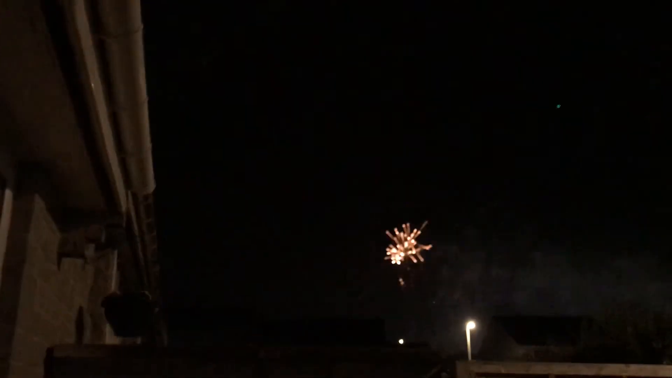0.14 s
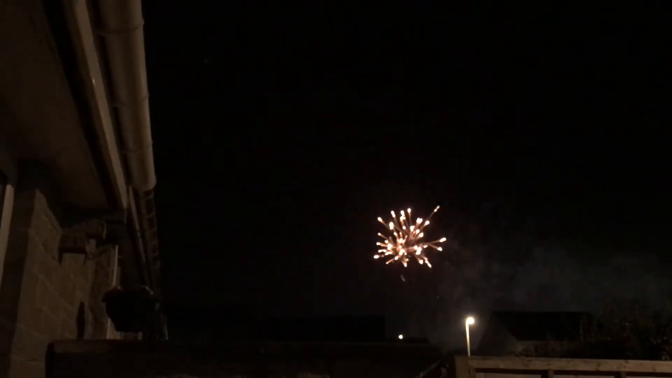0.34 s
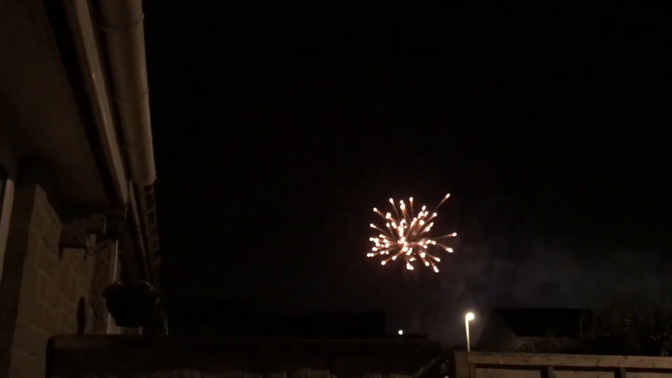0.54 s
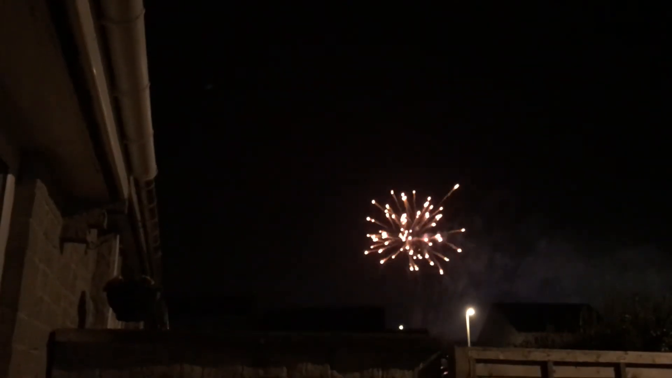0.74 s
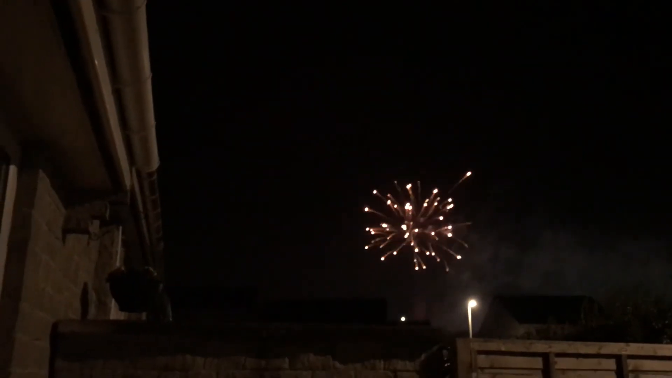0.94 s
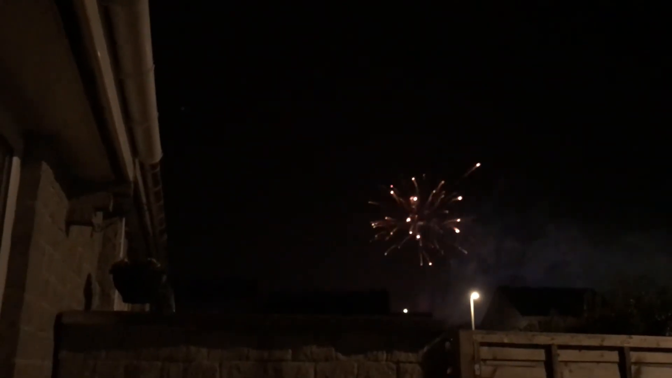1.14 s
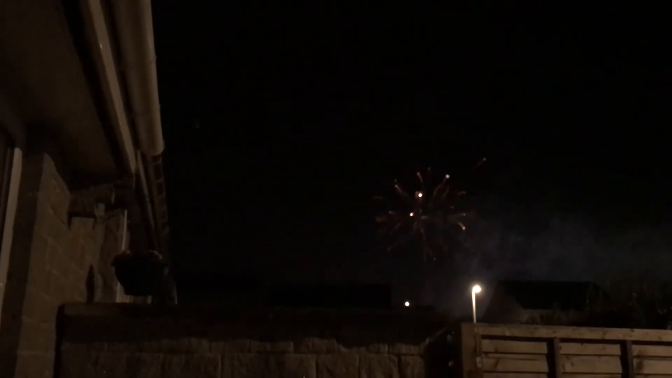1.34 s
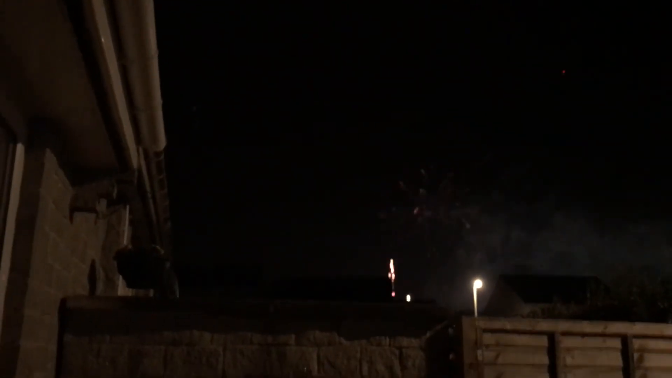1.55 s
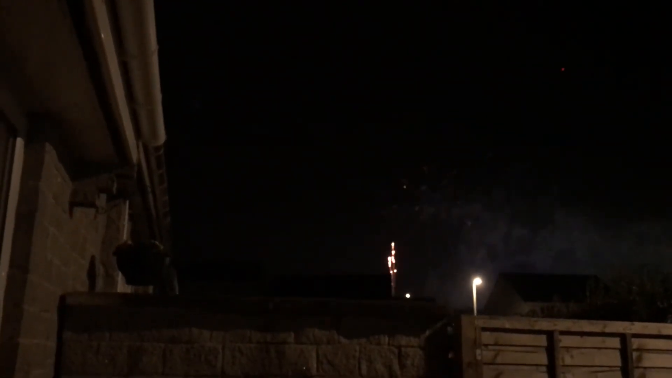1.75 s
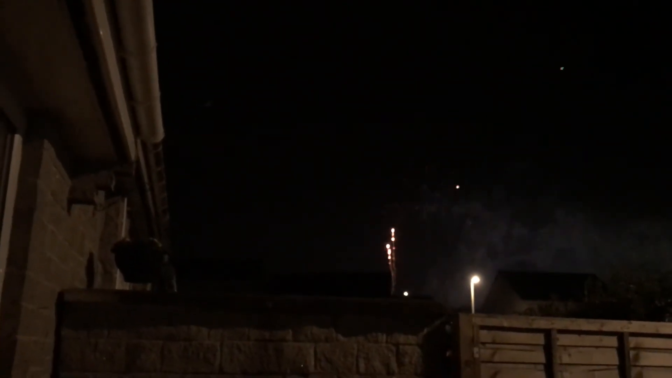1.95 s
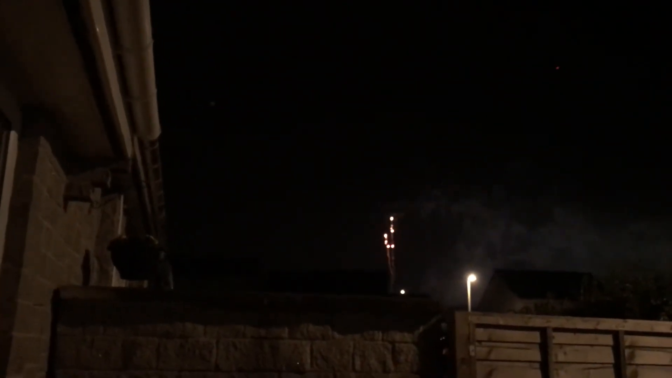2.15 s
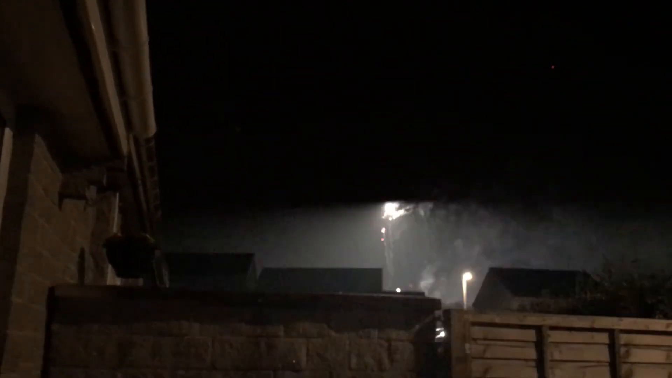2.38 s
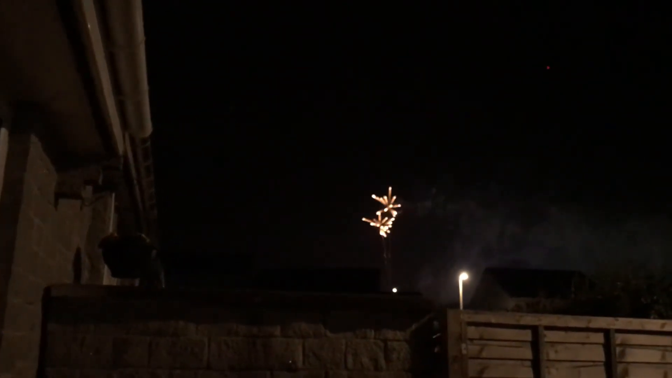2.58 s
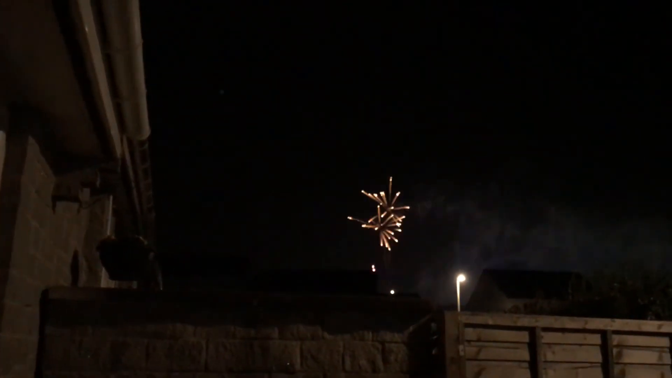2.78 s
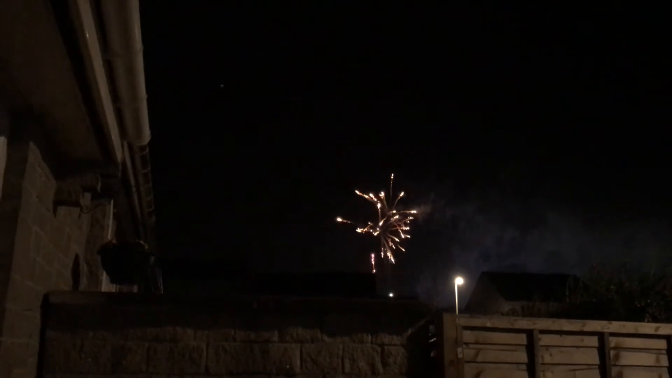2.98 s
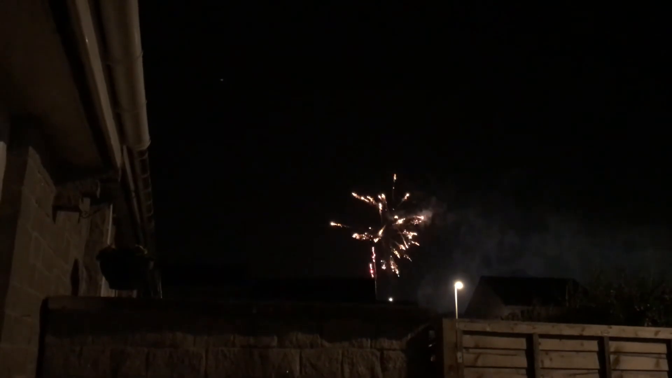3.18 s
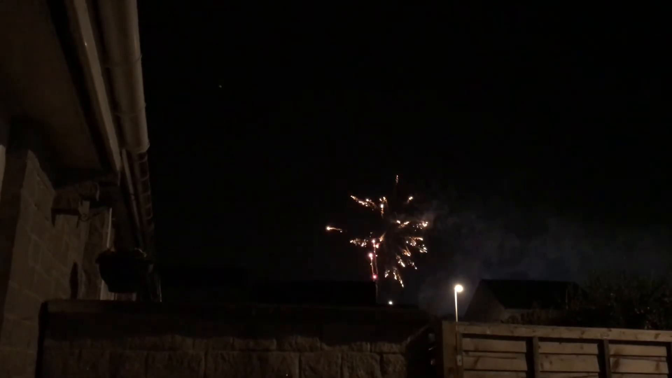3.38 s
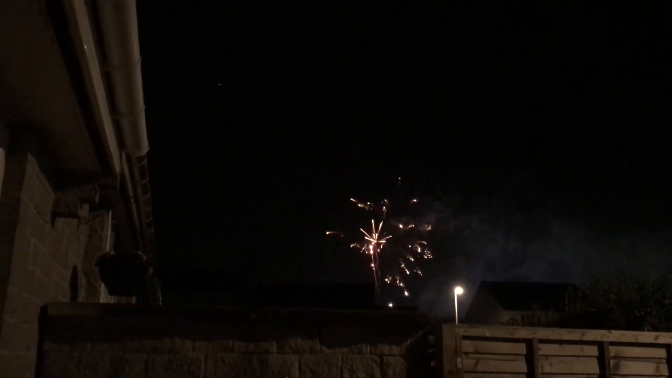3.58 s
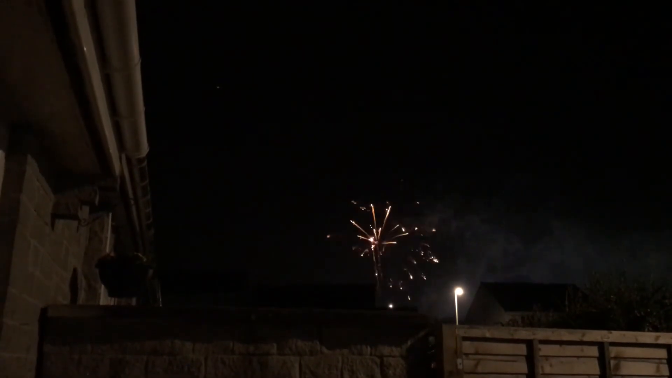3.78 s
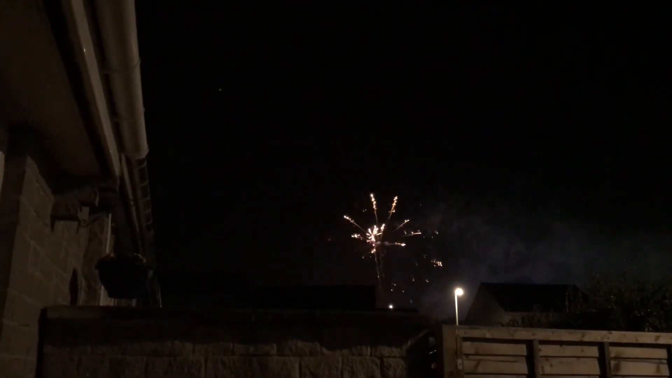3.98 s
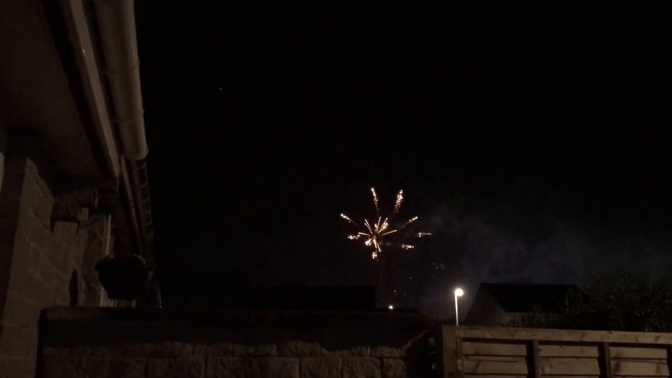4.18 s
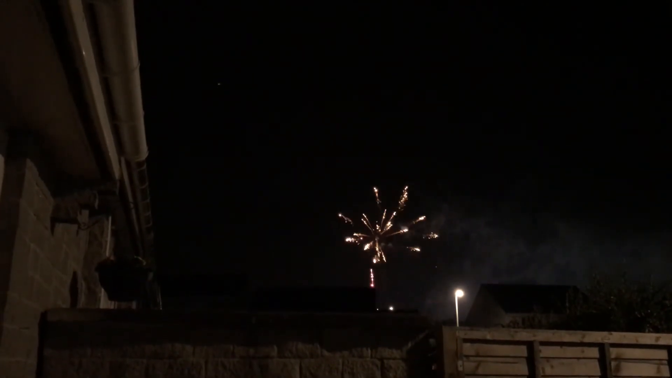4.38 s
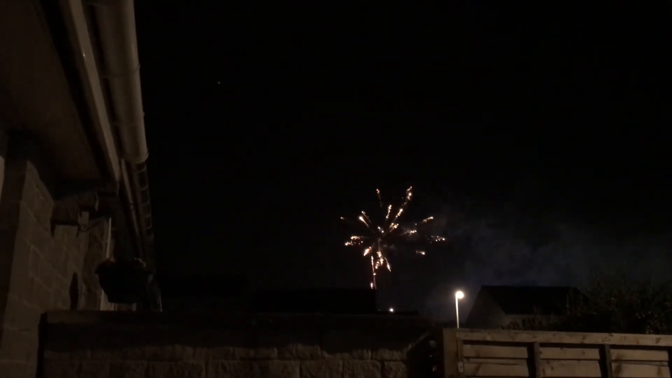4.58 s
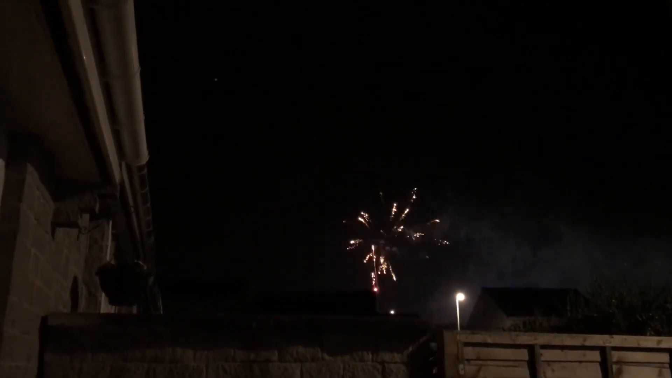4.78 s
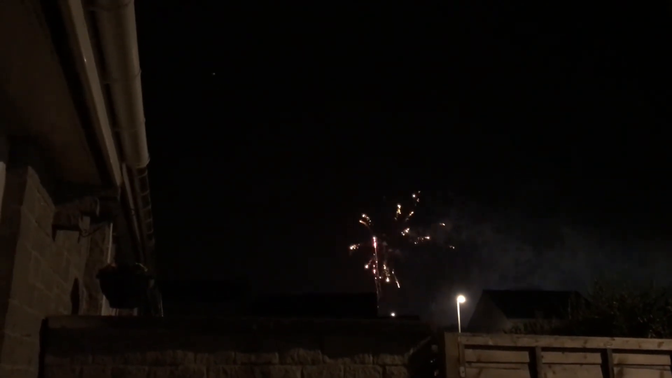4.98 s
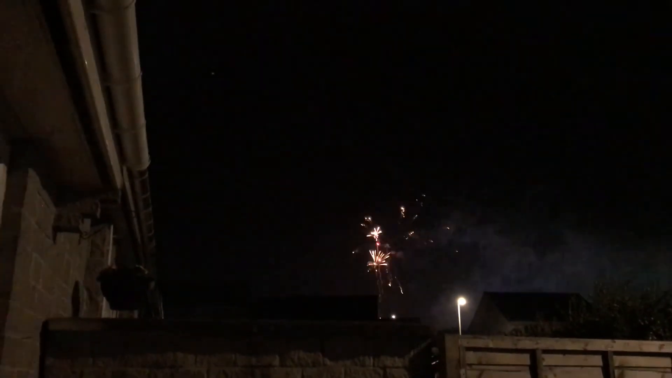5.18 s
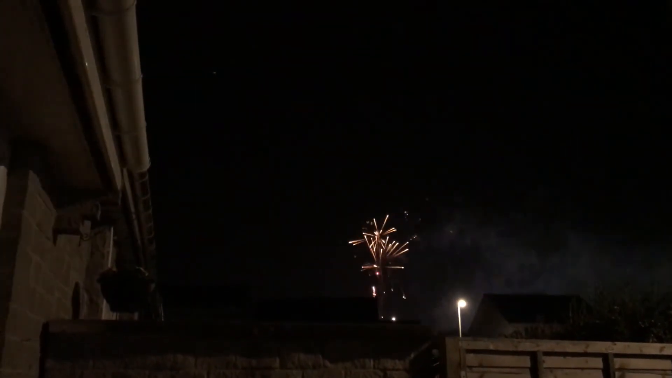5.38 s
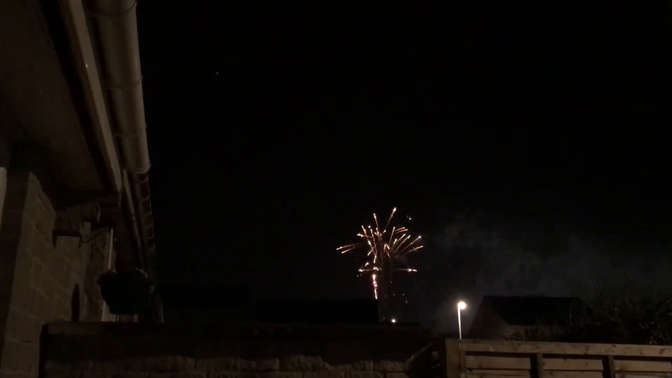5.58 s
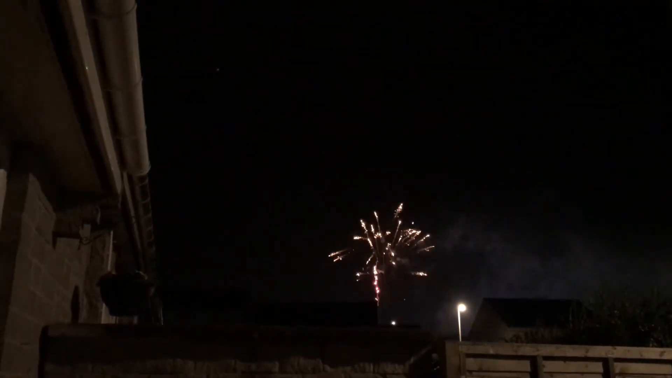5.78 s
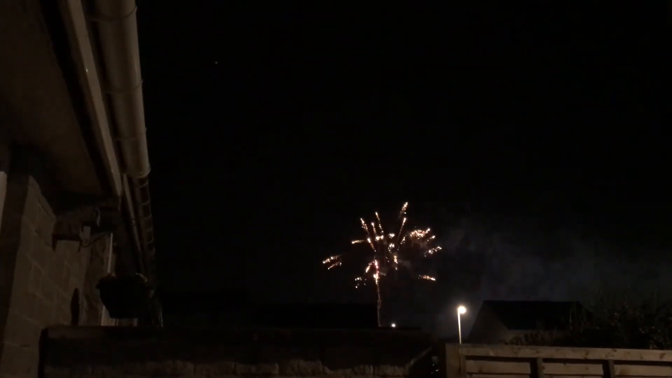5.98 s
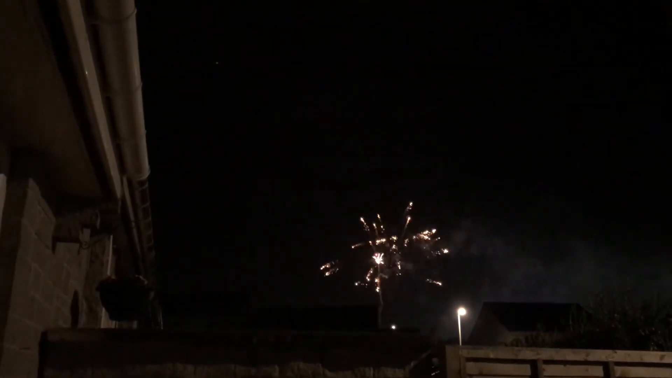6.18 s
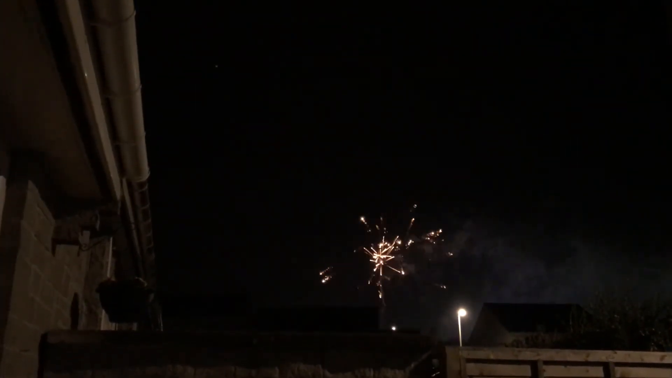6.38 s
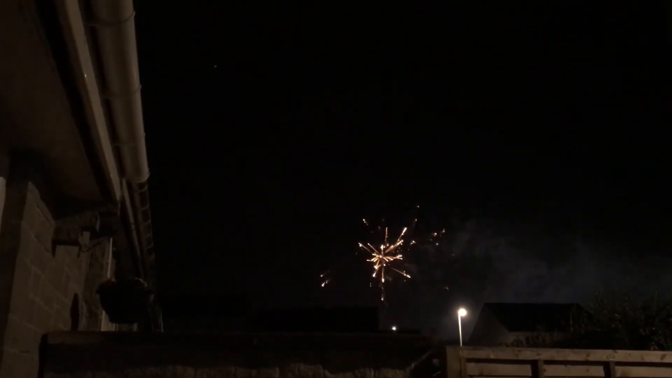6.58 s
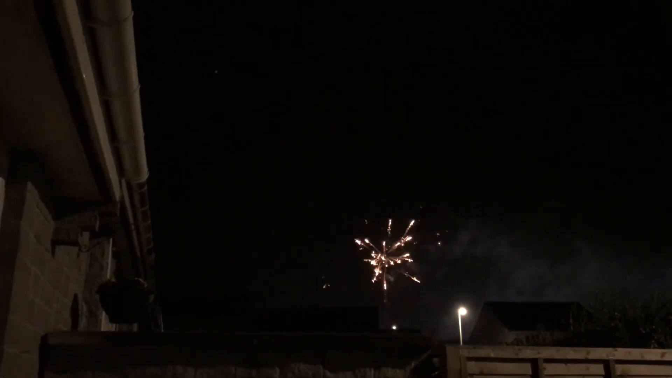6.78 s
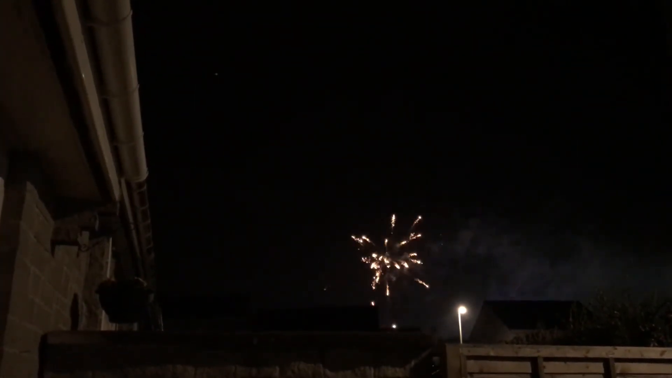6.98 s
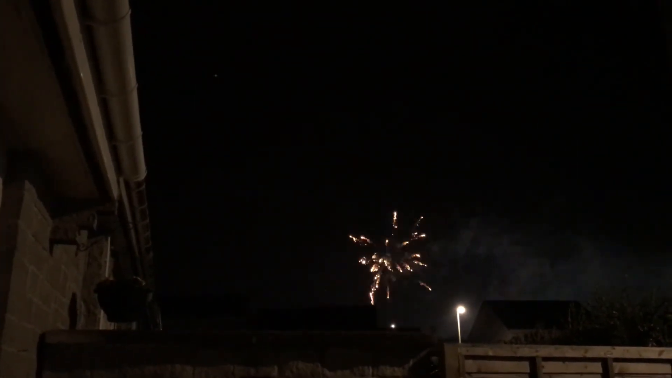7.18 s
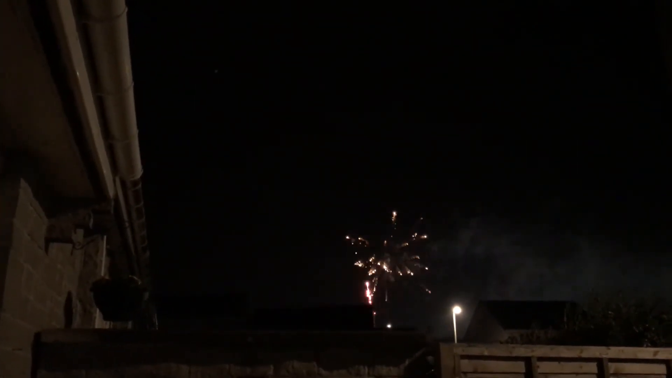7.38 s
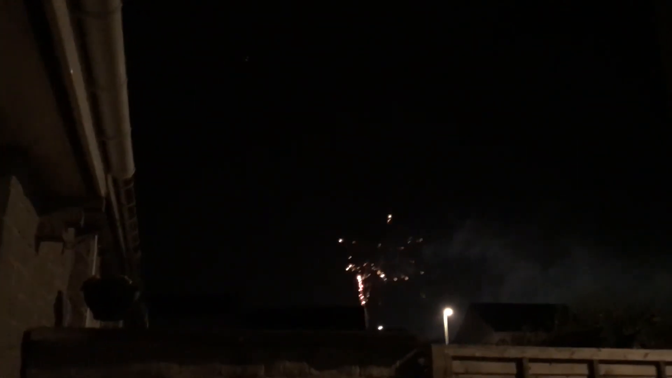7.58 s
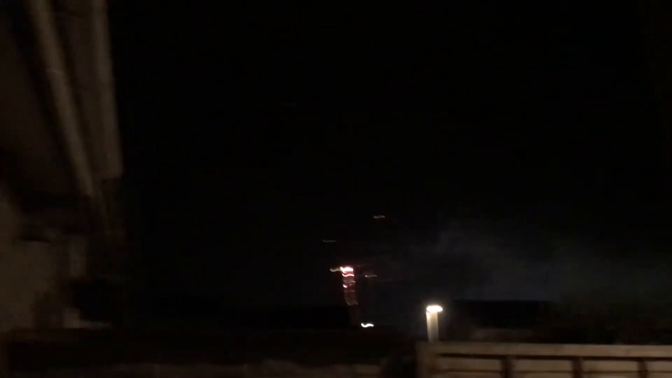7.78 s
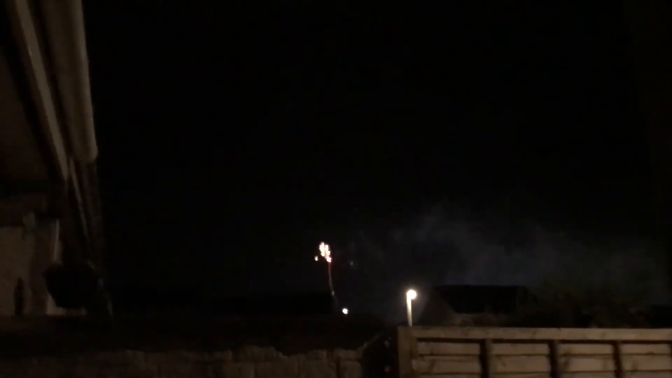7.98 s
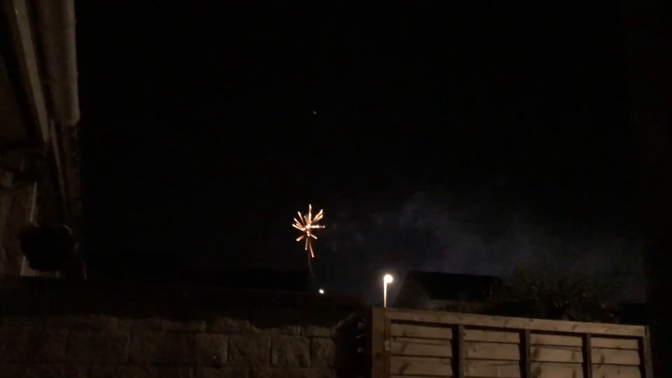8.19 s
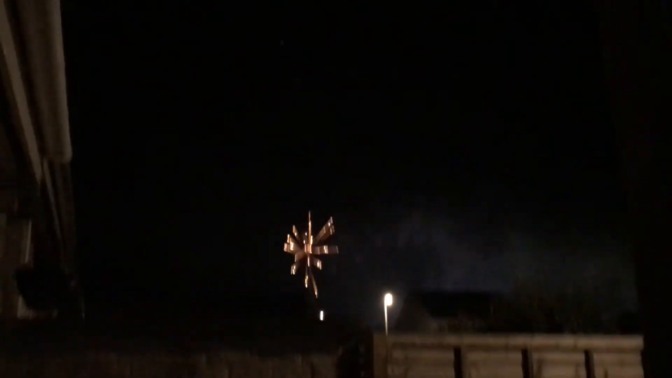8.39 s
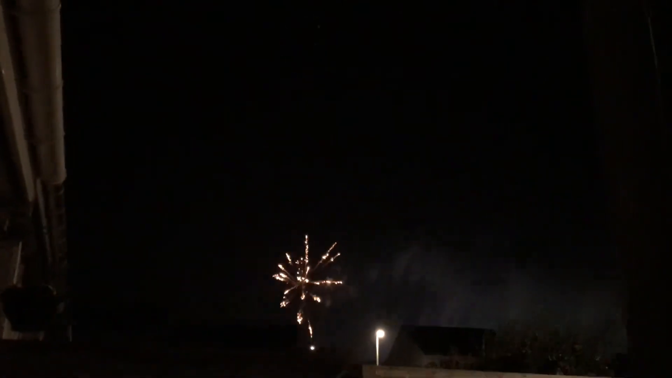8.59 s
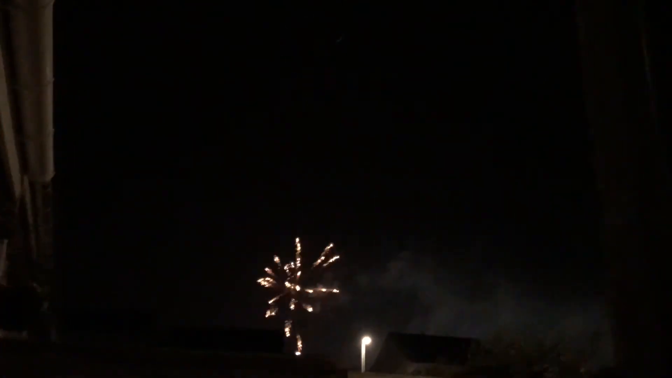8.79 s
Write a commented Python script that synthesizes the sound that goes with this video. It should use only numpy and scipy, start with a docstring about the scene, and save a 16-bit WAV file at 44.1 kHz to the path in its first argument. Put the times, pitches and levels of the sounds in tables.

```python
"""Firework shells over a housing estate

Aerial shells burst at night, heard from a walled yard through a phone. Each blast is a pressure jump
repeated by the yard walls, with a faint pre-echo; filtered, smeared copies return from single house fronts.
Shaped noise makes the scatter of the near gardens, the roll from further rows of houses, the town hum
below and a sleeve that rustles as the phone is shifted. Two dull thuds far off are decaying sines."""
import sys
import numpy as np
from scipy import signal
from scipy.fft import rfft, irfft, next_fast_len
from scipy.io import wavfile
from scipy.ndimage import uniform_filter1d

SR = 44100
rng = np.random.default_rng(int(sys.argv[2]) if len(sys.argv) > 2 else 0)


def generate_wav(sig):
    """Save sig (samples, or channels by samples) to the path in sys.argv[1] as 16-bit PCM at SR."""
    pcm = np.round(np.clip(np.atleast_2d(sig).T, -1, 1) * 32767).astype(np.int16)
    wavfile.write(sys.argv[1], SR, pcm)


def volts_from_db(level):
    """Convert decibel levels to linear amplitude ratios."""
    exponent = np.asarray(level, float) / 20
    return 10 ** exponent


N = 390285
LEAD = 1200  # samples of room ahead of each bang, for its pre-echo


def resonance(s, hz, width):
    """Band-pass response with gain 1 at the centre; width is relative to the centre."""
    return width * s / hz / ((s / hz) ** 2 + width * s / hz + 1)


# All-pass stages that make the lows trail the crack. Each row: centre in Hz, width over centre.
LOW_LAG = [(540, 2.3), (520, .2), (187, .98)]
# Repeats of the bang by the near walls, the last a late thump. The first row is no wall but a pre-echo,
# a faint tick ahead of the bang.
# Each row: delay in ms, share of the direct pressure, top in Hz, delay scatter in ms.
REPEATS = [(-22, 0.045, 8100, 0.37), (1.4, -0.68, 18000, 0.056), (2.5, -0.44, 6000, 0.12),
           (19.5, 0.47, 6200, 0.37), (39., 0.25, 740, 0.54)]
BLAST_S, BLAST_LOW_HZ = 0.00286, 264  # time constant of the pulse, low cut
BODY_TOP_HZ, CRACK_DB, CRACK_TOP_HZ = 1370, -1, 13100  # rounded body, with the steep front left as a crack
YARD_HZ, YARD_WIDTH, YARD_DB = 311, 0.11, -4  # the walled yard booms: centre, width over centre, level


def blast(draw):
    """Spectrum of a pressure jump that sags into suction, lows trailing, with wall repeats and a pre-echo."""
    s = 1j * (np.arange(2049) * SR / 4096 + 1e-3)  # imaginary frequency in Hz
    u = s * 2 * np.pi * BLAST_S * (1 + 0.051 * draw[0])  # every shell differs a little in length
    pulse = BLAST_S * SR * u / (1 + u) ** 2
    body = 1 / (1 + s / BODY_TOP_HZ)
    crack = volts_from_db(CRACK_DB) / (1 + s / CRACK_TOP_HZ)
    pulse = pulse * (body + crack)
    pulse = pulse * (1 + volts_from_db(YARD_DB) * resonance(s, YARD_HZ, YARD_WIDTH))
    low = s / BLAST_LOW_HZ
    for damping in (1.85, 0.765):  # two stages of a fourth-order low cut
        pulse = pulse * low ** 2 / (low ** 2 + damping * low + 1)
    for hz, width in LOW_LAG:
        square, slope = (s / hz) ** 2 + 1, width * s / hz
        pulse = pulse * (square - slope) / (square + slope)
    repeats = 1
    for (ms, share, top_hz, scatter_ms), chance in zip(REPEATS, draw[1:]):
        delay_s = (ms + scatter_ms * chance) / 1000
        repeats = repeats + share * np.exp(-2 * np.pi * s * delay_s) / (1 + s / top_hz)
    return s, pulse * repeats * np.exp(-2 * np.pi * s * LEAD / SR)


# The shells; the first burst just before the start, so only its echoes are heard.
# Each row: start in seconds, blast trim in dB, near scatter trim in dB, far roll trim in dB,
# house-front echo trim in dB, further gain of the later fronts in dB per second of delay.
BANGS = [(-.396, 3.5, 3, -7, -1.5, -14.5), (0.5997, 0.5, 2.5, 0, -12, 8.5),
         (0.6257, 0.5, -3, -14, -18, 8.5), (0.6468, 0, -7, -2, -10.5, 9.5),
         (0.739, -1.5, -5.5, -1.5, -14, 6.5), (0.8071, -3.5, -5.5, 3.5, -8.5, 0.5),
         (3.1164, 0, -4.5, 2.5, -5, 1.5), (3.1263, 1, 0, -1.5, -2, 2.5), (4.135, -0.5, 2, 2.5, 0.5, -13.5),
         (4.6135, 0.5, -2.5, 1, -7, 1.5), (5.7863, -1.5, 4, 2.5, -0.5, 0), (5.8492, -1, -1.5, -2.5, 9, -18),
         (6.8553, 1, 0.5, -1, -3, -3), (6.9492, -0.5, -2.5, -2, 4, -12.5), (8.6146, -1, 4, 13, 0, 0),
         (8.7495, 1, 1, 0, 0, 0)]
# Pre-echo: thin ringing smeared ahead of each direct bang, no part of the shell's own sound.
# Each row: pitch in Hz, width over centre, level in dB against the bang's own spectrum.
PRE_ECHO = [(1200, 0.092, -10.5), (3150, 0.017, -4.5)]
BLAST_DB = 4  # added to every blast trim


def blasts():
    """The shells heard directly, each one blast pulse with pre-echo ringing ahead of it."""
    out = np.zeros(N + 8192)
    chance = rng.standard_normal((len(BANGS), 1 + len(REPEATS)))
    for (start, db, *_), draw in zip(BANGS[1:], chance):
        s, spectrum = blast(draw)
        # a resonance of -s rings backwards in time
        ringing = sum(volts_from_db(ring_db) * resonance(-s, hz, width) for hz, width, ring_db in PRE_ECHO)
        at = int(start * SR) - LEAD
        out[at:at + 4096] += volts_from_db(db + BLAST_DB) * irfft(spectrum * (1 + ringing))
    return out[:N]


# Single house fronts that throw every bang back. Each row: delay after the bang in seconds,
# knock peak in dB before the bang's trims, knock centre in Hz, spread in ms, snap in dB over the knock.
HOUSE_FRONTS = [(.3715, -22, 950, 11.3, -9), (.598, -32.5, 1090, 6.7, -1), (.849, -27, 890, 13, -8),
                (1.2152, -27.5, 1200, 16, -21)]
KNOCK_WIDTH, SNAP_HZ, SNAP_WIDTH = 1.42, 2780, 0.94  # widths over centre
FACE_ON = 0.22  # the flat wall itself, against the norm of the scattered ledges
# echoes come in low, so the wall across the yard repeats their snap strongly
YARD_AGAIN_MS, YARD_AGAIN = 17, 0.81


def facades():
    """Thin copies of every blast, smeared by sills, eaves and porches at slightly different depths."""
    out, t = np.zeros(N + 3 * SR), np.arange(2048) / SR
    draw_count = 1 + len(REPEATS) + len(t)
    chance = rng.standard_normal((len(BANGS), len(HOUSE_FRONTS), draw_count))
    for (start, *_, echo_db, later_db), draws in zip(BANGS, chance):
        for (delay, db, hz, ms, snap_db), draw in zip(HOUSE_FRONTS, draws):
            s, spectrum = blast(draw)
            # cubing leaves a few ledges standing out
            ledges = draw[-len(t):] ** 3 * np.exp(-t / (ms * 1e-3))
            spectrum = spectrum * (rfft(ledges, 4096) + FACE_ON * np.linalg.norm(ledges))
            knock = irfft(spectrum * resonance(s, hz, KNOCK_WIDTH) ** 2)
            yard_repeat = 1 + YARD_AGAIN * np.exp(-2 * np.pi * s * YARD_AGAIN_MS / 1000)
            snap_band = resonance(s, SNAP_HZ, SNAP_WIDTH) ** 2 * s / (s + SNAP_HZ)
            snap = irfft(spectrum * snap_band * yard_repeat)
            echo = knock / np.abs(knock).max() + volts_from_db(snap_db) * snap / np.abs(snap).max()
            at = int((start + delay) * SR) - LEAD + SR  # a spare second holds what precedes the start
            out[at:at + 4096] += volts_from_db(db + echo_db + later_db * delay) * echo
    return out[SR:SR + N]


BANDS_HZ = 25 * 2 ** np.arange(0, 9.6, .5)  # half-octave centres
STEP = 16  # samples between envelope points


def colour(table, hz):
    """Spectrum level in dB, drawn straight between points on a log frequency axis."""
    table_hz, table_db = np.transpose(table)
    return np.interp(np.log(hz), np.log(table_hz), table_db)


def shares(table):
    """Power of each half-octave band, summing to 1; only the shape of the table counts."""
    power = volts_from_db(2 * colour(table, BANDS_HZ)) * BANDS_HZ
    return power / power.sum()


def walk(rate):
    """Random levels held 1 / rate seconds and slewed twice; spread near 1."""
    k = int(SR / STEP / rate)
    held = np.repeat(rng.standard_normal(N // STEP // k + 2), k)
    return 0.64 * uniform_filter1d(uniform_filter1d(held, k), k)[:N // STEP + 1]


def band_noise(power):
    """Noise split into half-octave bands that follow rows of power over time."""
    size = next_fast_len(N)
    white = rfft(rng.standard_normal(size))
    hz = np.arange(size // 2 + 1) * SR / size + 0.0009
    out = np.zeros(N)
    for centre, row in zip(BANDS_HZ, power):
        window = np.cos(np.pi / 2 * np.clip(2 * np.log2(hz / centre), -1, 1))
        band = irfft(white * window, size)[:N]
        level = np.interp(np.arange(N) / STEP, np.arange(len(row)), np.sqrt(row))
        out += band / band.std() * level
    return out


# Scatter from the gardens around. Each row: time after the bang in seconds, level in dB before its trim.
GARDEN_FADE = [(0, -28.5), (.006, -13.5), (0.032, -17.5), (0.061, -23), (.1, -25), (0.142, -32.5),
               (.2, -46.5), (.3, -47), (.4, -66)]
# Spectrum shape of the garden scatter. Each row: frequency in Hz, relative level in dB per Hz.
GARDEN_COLOUR = [(24, -51), (40, 4), (150, 1.5), (253, 0), (325, 2), (606, -5), (758, -9.5), (949, -3),
                 (1050, -6.5), (1560, -12), (2920, -16.5), (7520, -29), (15500, -47.5)]
# Spectrum shape of the far roll. Each row: frequency in Hz, relative level in dB per Hz.
ROLL_COLOUR = [(24, -44), (40, -3), (103, -0.5), (188, -4.5), (260, -1), (722, -11.5), (926, -8.5),
               (1380, -15), (2390, -20), (4240, -30), (7710, -45), (15500, -63)]
# Rows of houses further off, each sending back a roll. Each row: peak in seconds after the bang,
# level in dB before the bang's trim, extra boom in dB, rise in seconds, fade in dB per second.
HOUSE_ROWS = [(.14, -41.5, -3, 0.12, 10), (.4, -39.5, 2, 0.046, 26.5), (.468, -42.5, 8, 0.026, 142),
              (1.225, -52.5, -1.5, 0.016, 12.5)]
NEAR_LOSS_DB, FAR_LOSS_DB = 5, 2  # air dulls the treble: dB per octave above 1 kHz per second of travel
ROLL_S = 3  # each bang's scatter ends here


def echoes():
    """Band power of the diffuse scatter: near gardens, then the far roll, duller with travel."""
    t = np.arange(N // STEP + 1) * STEP / SR
    octaves = np.log2(np.maximum(BANDS_HZ / 1000, 1))[:, None]
    near_s, near_db = np.transpose(GARDEN_FADE)
    boom = np.exp(-(np.log2(BANDS_HZ / 350) / 2.1) ** 2)[:, None]  # weight of each band in the boom range
    near, far = np.zeros((2, len(BANDS_HZ), len(t)))
    for start, _, garden_db, roll_db, *_ in BANGS:
        span = (t >= start) & (t < start + ROLL_S)
        age = t[span] - start
        fade = np.interp(age, near_s, near_db, right=-200)
        near[:, span] += volts_from_db(2 * (garden_db + fade - NEAR_LOSS_DB * octaves * age))
        duller = volts_from_db(2 * (roll_db - FAR_LOSS_DB * octaves * age))
        for peak_s, db, boom_db, rise_s, fade_db in HOUSE_ROWS:
            late = age - peak_s
            shape = np.where(late < 0, np.exp(-(late / rise_s) ** 2), volts_from_db(-2 * fade_db * late))
            far[:, span] += duller * volts_from_db(2 * (db + boom * boom_db)) * shape
    # separate reflections arrive in clumps; far off, the slower lumps sit in the boom range
    near_clumps = volts_from_db(2 * (2.3 * walk(300) + 1.0 * walk(60)))
    far_clumps = volts_from_db(2 * (2.0 * walk(140) + 3.2 * boom * walk(35)))
    near *= shares(GARDEN_COLOUR)[:, None] * near_clumps
    far *= shares(ROLL_COLOUR)[:, None] * far_clumps
    return near + far


# Cloth rubs. Each row: start in seconds, hold in seconds, level in dB, fade in dB per second.
SLEEVE_RUBS = [(7.575, .12, -47, 77), (7.8, 0.05, -39, 418), (8.055, 0.051, -48, 400.5),
               (8.2, .03, -61, 234), (8.353, .02, -57, 130)]
# Spectrum shape of the cloth. Each row: frequency in Hz, relative level in dB per Hz.
CLOTH_COLOUR = [(880, -35), (1500, 5), (1820, 3), (2310, -6), (3800, 3), (5090, -13), (7230, 2),
                (10700, -9.5), (15500, 0)]
SLEEVE_RISE_DB_PER_S = 424


def sleeve():
    """Band power of cloth sliding near the microphone, a little grainy."""
    t = np.arange(N // STEP + 1) * STEP / SR
    power = 0
    for start, hold, db, fade_db in SLEEVE_RUBS:
        rise = SLEEVE_RISE_DB_PER_S * np.maximum(start - t, 0)
        fade = fade_db * np.maximum(t - start - hold, 0)
        power = power + volts_from_db(2 * (db - rise - fade))
    grain = volts_from_db(2 * (1.5 * walk(300) + 1.6 * walk(30)))
    return shares(CLOTH_COLOUR)[:, None] * power * grain


# Dull thuds far off. Each row: start in seconds, peak in dB, pitch in Hz, t60 of the decay in seconds.
FAR_THUDS = [(2.769, -34, 220, 0.032), (3.067, -34, 212, .036)]


def thuds():
    """Low knocks: short decaying sines that swell in, the edge worn off by distance."""
    out, t = np.zeros(N), np.arange(4096) / SR
    for start, db, hz, t60 in FAR_THUDS:
        knock = np.sin(2 * np.pi * hz * t) * t * np.exp(-np.log(1000) * t / t60)
        at = int(start * SR)
        out[at:at + 4096] += volts_from_db(db) * knock / np.abs(knock).max()
    return out


# Spectrum shape of the night hum. Each row: frequency in Hz, relative level in dB per Hz.
TOWN_COLOUR = [(15, -54), (25, -17.5), (33, -4), (70, 1.5), (84, -6), (102, -0.5), (149, -29), (263, -12),
               (1130, -18), (4740, -41), (5880, -39), (9320, -49), (16000, -46)]
TOWN_DB = -51  # the whole hum, before it wavers


def town():
    """Band power of the night hum: a shared swell, each band wavering alone."""
    swell = walk(1.8)
    return np.array([share * volts_from_db(2 * (TOWN_DB + 1.0 * swell + 1.2 * walk(6.3)))
                     for share in shares(TOWN_COLOUR)])


def scene():
    """All sources summed at the one microphone."""
    noise = band_noise(echoes() + town() + sleeve())
    return (blasts() + facades() + noise + thuds())[None]


MIC_LOW_HZ, MIC_TOP_HZ, CUT_HZ = 45.2, 15700, 16800
DRIVE, KNEE = 0.96, 3.55  # the input levels off at 1 / DRIVE; a higher KNEE bends later


def roll_off(x):
    """The treble ends steeply here."""
    return signal.sosfilt(signal.butter(12, 16810, fs=SR, output="sos"), x)


def record(dry):
    """The microphone drops the deepest bass and the very top, then the input overloads softly."""
    dry = signal.sosfilt(signal.butter(4, MIC_LOW_HZ, "high", fs=SR, output="sos"), dry)
    dry = signal.sosfilt(signal.ellip(8, .3, 60, MIC_TOP_HZ, fs=SR, output="sos"), dry)
    dry = dry / (1 + np.abs(DRIVE * dry) ** KNEE) ** (1 / KNEE)
    # trim the treble that the overload adds
    dry = signal.sosfilt(signal.ellip(8, .1, 50, CUT_HZ, fs=SR, output="sos"), dry)
    return roll_off(dry)


dry = scene()
out = record(dry)
generate_wav(out)
```